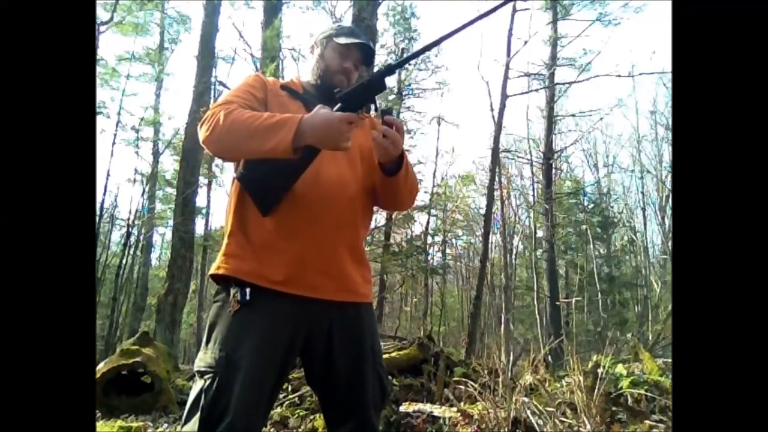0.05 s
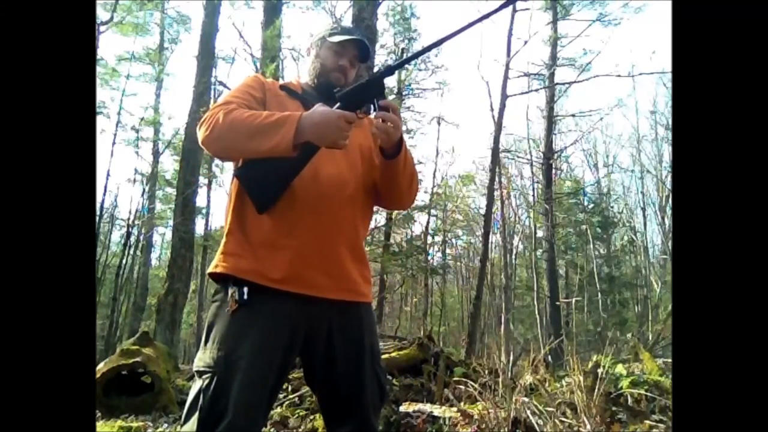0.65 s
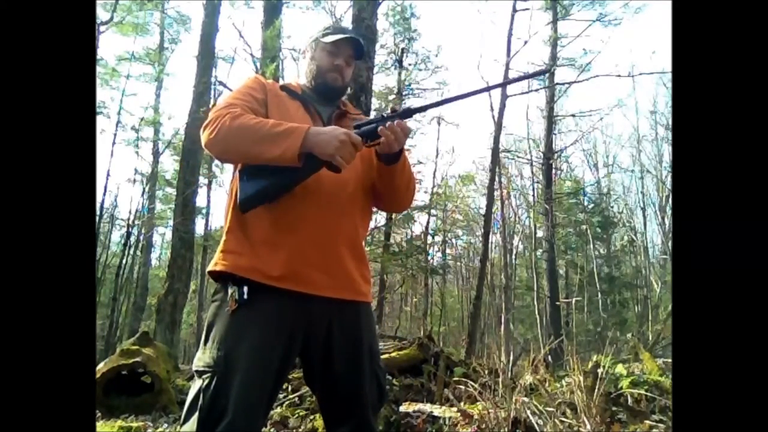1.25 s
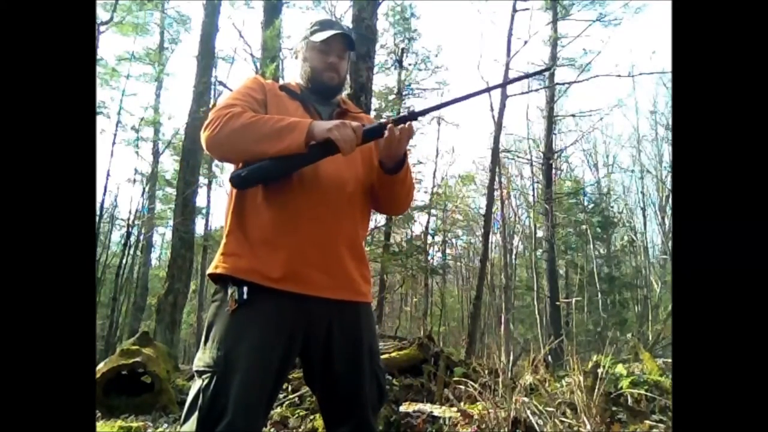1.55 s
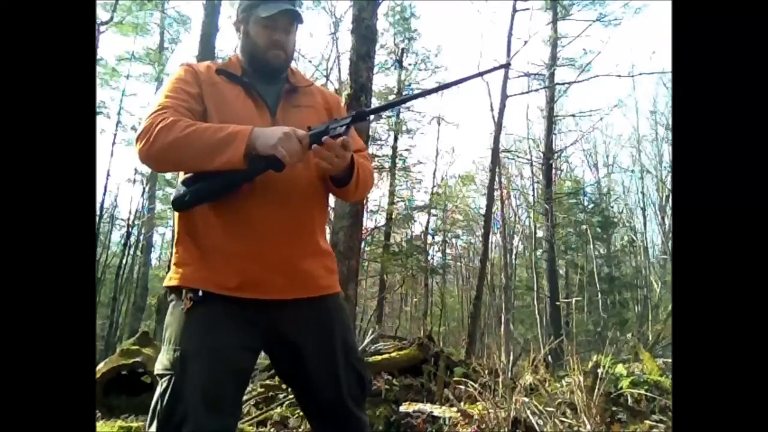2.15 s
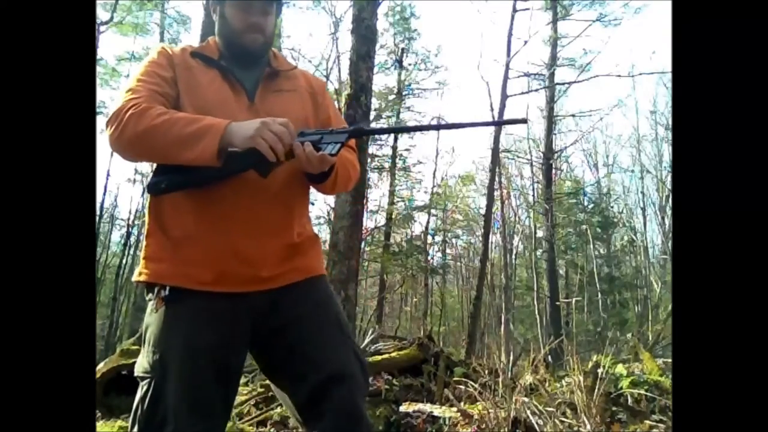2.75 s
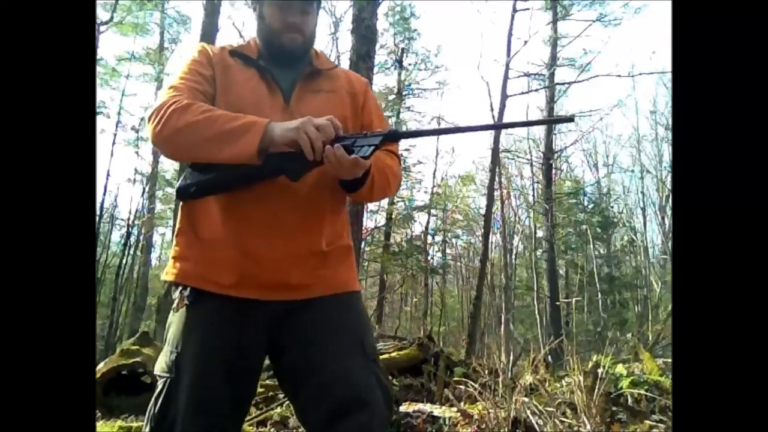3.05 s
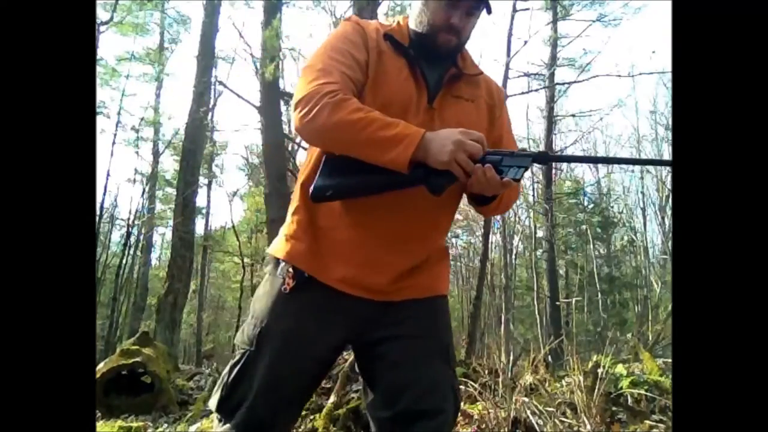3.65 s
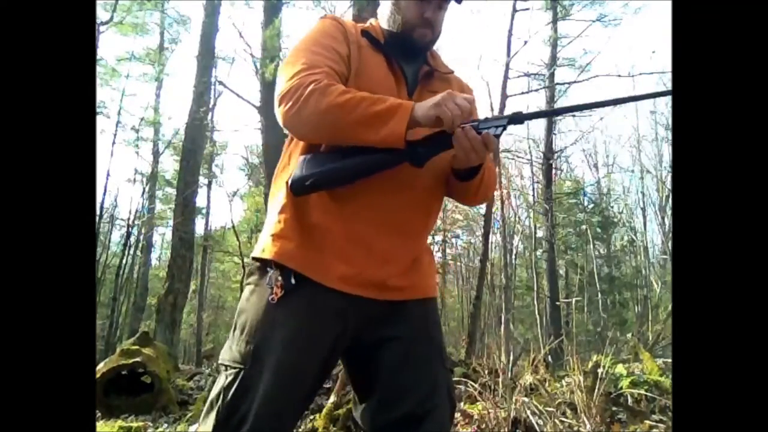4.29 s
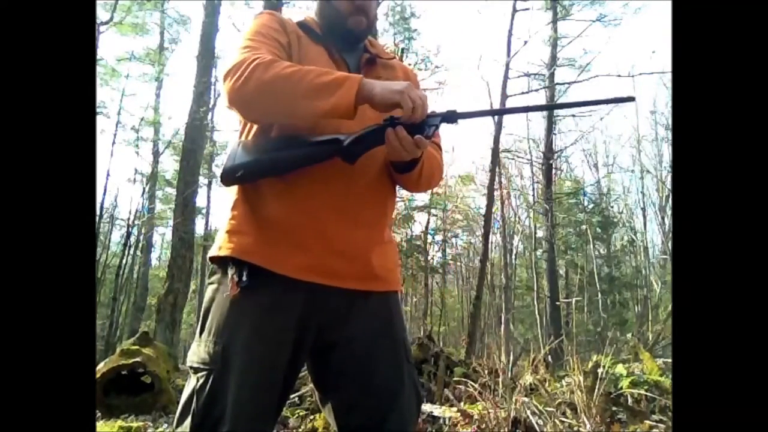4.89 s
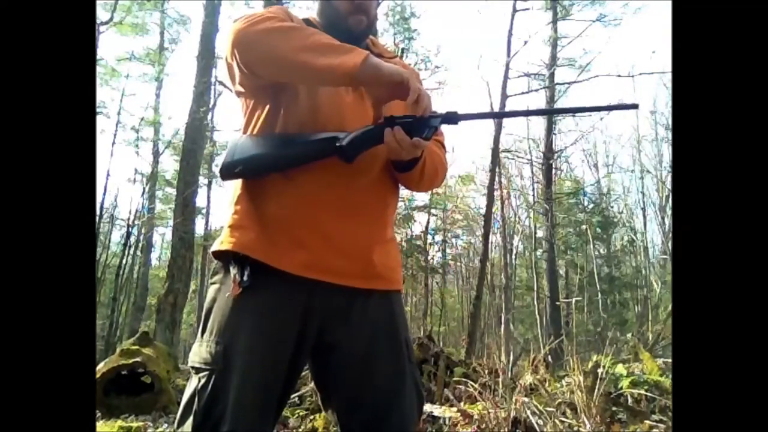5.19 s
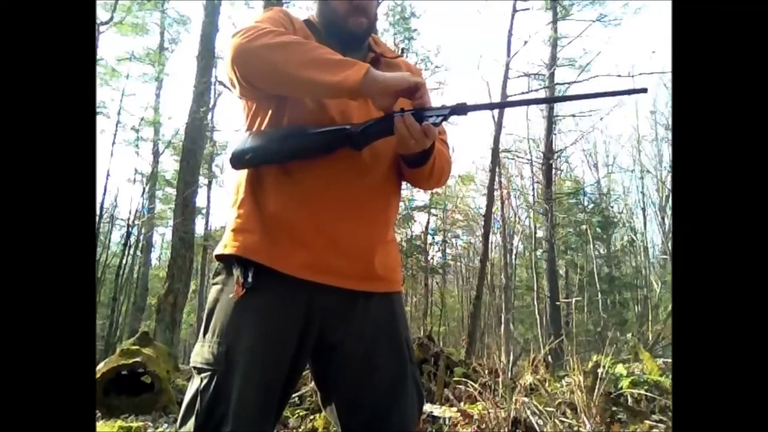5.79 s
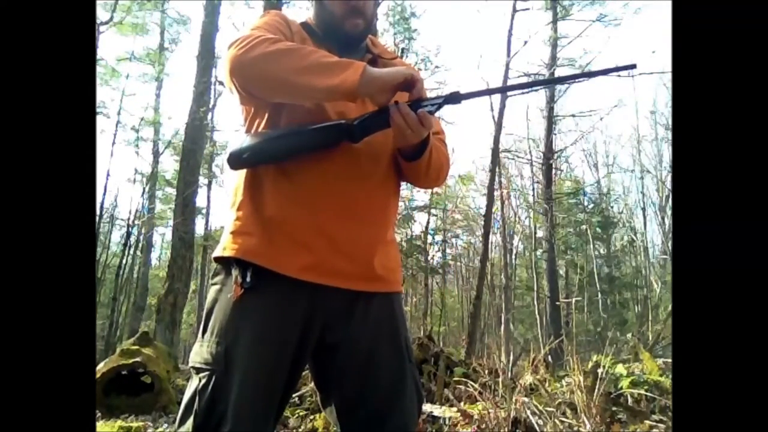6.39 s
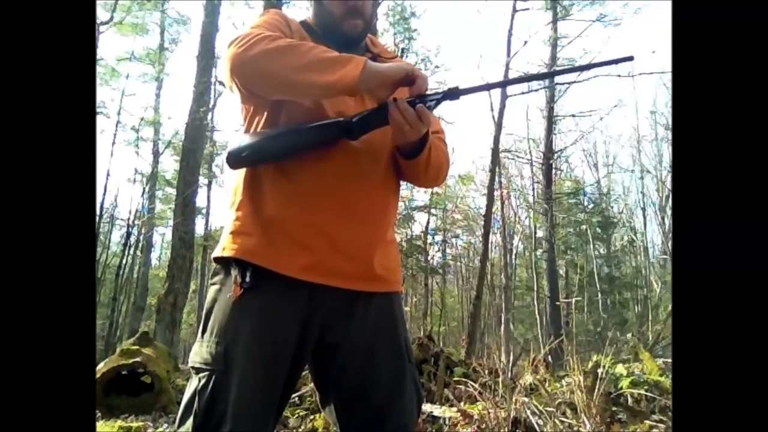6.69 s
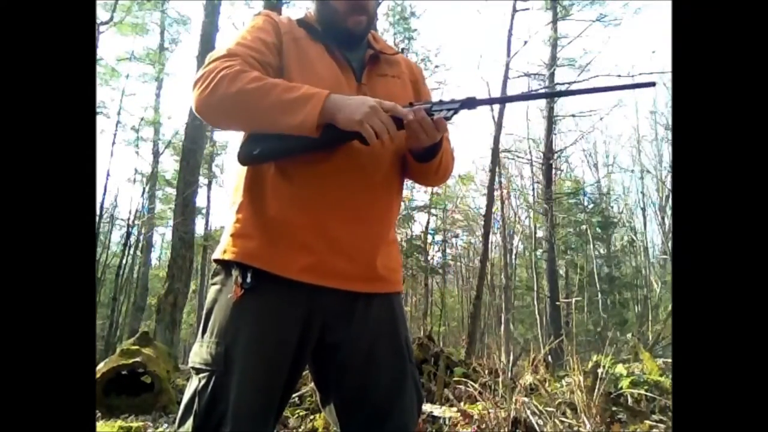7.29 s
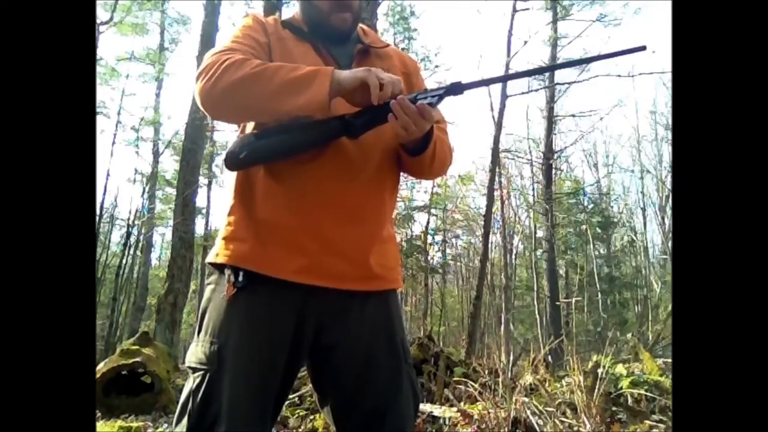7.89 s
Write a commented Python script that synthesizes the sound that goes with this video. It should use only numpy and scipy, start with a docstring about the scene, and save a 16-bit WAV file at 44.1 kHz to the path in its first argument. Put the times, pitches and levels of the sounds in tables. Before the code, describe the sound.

In quiet woods, a rifle magazine clicks into place, feet shift on leaves and twigs, then the bolt slides and snaps shut.

```python
"""In a quiet forest a man loads a small rifle: the magazine scrapes and snaps home, and the bolt is
drawn back and slams shut. Each steel impact radiates a clack and excites the damped modes of the
receiver and the hollow plastic stock. In between, dry leaves and twigs fracture under his feet.
Scattering from the trunks adds a faint tail over distant air and a low drone, and the small port
of the microphone resonates in the treble."""
import sys
import numpy as np
from scipy import signal
from scipy.fft import rfft, irfft, next_fast_len
from scipy.io import wavfile
from scipy.ndimage import map_coordinates

SR = 44100
rng = np.random.default_rng(int(sys.argv[2]) if len(sys.argv) > 2 else 0)


def dump_mix(stems):
    """Bounce the given channels to the path in sys.argv[1] as a 16-bit WAV at rate SR."""
    frames = np.atleast_2d(stems).T  # one column per channel
    limited = np.clip(frames, -1, 1)  # hard clip at full scale
    pcm = np.round(limited * 32767).astype(np.int16)
    wavfile.write(sys.argv[1], SR, pcm)


N = 349922

# Levels are relative within each table.
# spectrum of the forest air: f/Hz, level/dB
AIR_BAND = [(20, -34), (45, -8), (65, -6.5), (110, -3.5), (170, 5.5), (215, 1.5), (290, -3.5), (500, -2.5),
            (1000, -3.5), (1700, -11), (3000, -12.5), (6000, -14.5), (10000, -17), (15500, -20.5)]
# course of a far drone: t/s, f/Hz, level/dB
DRONE_PATH = [(0, 188.7, -73), (2.2, 184.6, -72), (3.2, 161.7, -70), (4.8, 154, -77), (5.5, 155.6, -62.5),
              (6.199, 158, -74.5), (7.95, 159.4, -67.5)]
# reverberation time among the trunks: f/Hz, T60/s
TRUNK_DECAY = [(200, .25), (500, 0.17), (1500, 0.34), (5000, 0.4), (12000, 0.32)]

# stirring of the litter by the feet: t/s, level/dB
TREAD_LEVELS = [(1.85, -70.5), (2.3, -50), (2.52, -49), (2.8, -33), (2.92, -35), (2.97, -40.5),
                (3.1, -42.5), (3.16, -58.5), (3.24, -49), (3.55, -54), (3.74, -49.5), (3.92, -56.5),
                (4.0, -49), (4.1, -51.5), (4.27, -47), (4.52, -52.5), (4.66, -59), (5.3, -69)]
# peaks of the boot scuffs: t/s, level/dB
BOOT_SCUFFS = [(3.05, -39.5), (3.853, -46.5), (4.25, -41)]
# peaks of the sleeve brushing the stock: t/s, level/dB
SLEEVE_BRUSHES = [(7.3, -58.5), (7.45, -53.5), (7.73, -51.5)]
# twigs breaking underfoot: t/s, level/dB, woody body re crack/dB
TWIG_SNAPS = [(2.475, -51.5, 3.5), (2.794, -49, -11), (2.8745, -39, -0.5), (2.889, -38.5, -6),
              (2.922, -42.5, 5), (2.993, -45.5, -3), (3.0201, -42, 3), (3.0562, -46, -11),
              (3.183, -55, 1.5), (3.254, -55, -4), (3.302, -54.5, 3), (3.481, -53.5, -8), (3.834, -48, -17),
              (4.129, -47, -16), (4.193, -50.5, -15), (4.246, -54, 5), (4.688, -48.5, -25)]
# spectra of packed leaves, loose leaves, stalks and soft ground: f/Hz, level/dB
CRUSH_BAND = [(80, -30), (220, 1), (550, 0), (1000, 3.5), (1800, 1), (3200, -6.5), (5000, 4), (9000, -26)]
RUSTLE_BAND = [(1000, -20.5), (2500, -7), (4200, -1.5), (6000, 1.5), (8500, -3), (12500, -1), (15500, -8)]
WOOD_BAND = [(600, -22), (2000, -17), (4000, -7), (6000, -2), (9000, -31)]
THUD_BAND = [(120, -21), (300, -2), (600, 6), (1000, -12), (2000, -38)]

# sliding parts: t/s, duration/s, centre f/Hz, level/dB, treble edge re scrape/dB
SLIDE_STROKES = [(.729, 0.026, 5750, -54, -18), (1.138, .012, 5300, -42, -7),
                 (2.117, 0.026, 5050, -41, -17), (5.031, 0.071, 5230, -55.5, -3),
                 (5.43, .054, 4900, -50.5, -6), (5.608, 0.033, 5900, -58, 1), (5.641, .014, 5740, -44, -5),
                 (6.506, 0.016, 5500, -46, -8), (6.846, .02, 5740, -51.5, 6)]
# steel impacts: t/s, level/dB, weight (stock knock re clack)/dB, treble edge re clack/dB
IMPACTS = [(0.189, -66, 4, 10), (0.3626, -39.5, 2.5, -1), (0.488, -57.5, 3.5, 2), (.776, -59, 10, 5.5),
           (.814, -56, 0, -5), (.96, -60.5, 10, -14), (0.9948, -45, -8.5, -9), (1.005, -40.5, -16, -9),
           (1.015, -43, -5.5, -3), (1.055, -33.5, -18.5, -3.5), (1.149, -27.5, -12, -4),
           (1.167, -34, -5.5, 4.5), (1.181, -29, -19, 3), (1.506, -55, -13, -10), (1.536, -58, -13, -2),
           (1.5689, -27.5, -31, -7), (1.596, -76.5, 23.5, 4), (4.013, -42, -12, -16), (4.456, -44, -11, -4),
           (4.8086, -39.5, -14.5, -9), (5.106, -52, -28, 1), (5.413, -49.5, -14, 11),
           (5.483, -38.5, -7.5, 0.5), (5.598, -56.5, -12, 6), (5.658, -30.5, -21, 0), (5.672, -38.5, 11, 1),
           (5.684, -39.5, -6, 4), (6.173, -64, 9, 3), (6.197, -50, -7.5, 5), (6.495, -57, -3, 0),
           (6.5271, -32.5, -11, 5), (6.533, -31.5, -8, 6.5), (6.646, -63, -27, -6), (6.725, -62, -11, 7.5),
           (6.8643, -21, -2.5, -2), (6.868, -27, -2, 1.5), (6.9687, -27.5, -23.5, -6),
           (6.9886, -41, -16, -9), (7.62, -62.5, -15, -6)]
# modes of the hollow stock, damped by the hands: f/Hz, level/dB, T60/s
STOCK_MODES = [(339, -7, 0.072), (437, -5.5, 0.068), (489, 4.5, 0.049), (550.4, 2.5, 0.069),
               (615, -2.5, 0.056), (818, -8.5, 0.071)]
# modes of barrel and receiver: f/Hz, level/dB, T60/s
STEEL_MODES = [(933, 13, 0.097), (1240, 10.5, 0.13), (1280, -14, 0.045), (1590, -4.5, 0.045),
               (1778, 0, 0.1), (1987, 11, 0.1), (2280, 1.5, .06), (2570, -8, 0.12), (2630, 3.5, 0.032),
               (3030, 0, 0.0577), (3350, 6, 0.07), (3630, -17, 0.03), (3980, -24, 0.042), (4000, 9, 0.1),
               (4600, 4, .05), (4480, 7.5, 0.11), (4830, -3, 0.091)]
# parts that ring on (magazine shell, brass case, stock): t/s, f/Hz, level/dB, T60/s
RINGING_PARTS = [(1.151, 3340, -37, 0.28), (1.182, 440, -42, 0.19), (5.415, 11060, -35, 0.057),
                 (5.485, 3830, -36.5, 0.02), (5.678, 10500, -32, 0.095), (5.675, 783, -40, 0.039),
                 (6.865, 445, -29.5, 0.16), (6.865, 1690, -29, .055), (6.866, 2710, -28, .04)]
# spectra of stock, receiver, clack, treble edge and spring: f/Hz, level/dB
STOCK_BAND = [(100, -48), (240, -24), (340, -9), (510, 9.5), (620, 2.5), (720, -35), (1200, -52.5)]
STEEL_BAND = [(300, -32.5), (850, -1), (1700, 4), (2600, -1.5), (4200, -4.5), (6000, -34), (9000, -42)]
CONTACT_BAND = [(1500, -25), (3200, -4), (4800, 0.5), (5700, 4), (6500, 1.5), (8000, -4.5), (11000, -22),
                (16000, -41.5)]
TREBLE_BAND = [(5000, -41), (8000, -4), (11300, 6), (13000, -1), (15500, -10)]
SPRING_BAND = [(2100, -38), (4700, -18), (6400, 6), (8600, -16), (12000, -43)]

# resonance of the microphone port: f/Hz, bandwidth/Hz, resonant path re direct path/dB
PORT_RESONANCE = [(6075, 616, 11)]


def amp(db):
    """Amplitude ratio of a level in decibels."""
    return 10 ** (np.asarray(db) / 20)


def unit(x):
    """Normalisation to rms 1."""
    return x / np.sqrt(np.mean(x ** 2) + 1e-20)


def unit_energy(x):
    """Normalisation of a transient to the energy of 10 ms at rms 1."""
    return x / np.sqrt(np.sum(x ** 2) / (SR / 100) + 1e-20)


def along(points, hz):
    """Interpolation of (f/Hz, value) points on a logarithmic frequency axis."""
    f, values = np.transpose(points)
    return np.interp(np.log(hz + 1), np.log(f + 1), values)


def wobble(rate):
    """Smooth random modulation with `rate` knots a second."""
    return map_coordinates(rng.standard_normal(int(N * rate / SR) + 4), [np.arange(N) * rate / SR])


def strokes(rows, rise_db_s, fall_db_s):
    """Exponential growth and decay about each (t/s, level/dB) peak."""
    t = np.arange(N) / SR
    return sum(amp(db - np.maximum(rise_db_s * (s - t), fall_db_s * (t - s))) for s, db in rows)


def filtered(x, response):
    """Linear filtering: the spectrum is multiplied by a frequency response."""
    size = next_fast_len(len(x) + 4096)
    return irfft(rfft(x, size) * response(np.fft.rfftfreq(size, 1 / SR)), size)[:len(x)]


def coloured(x, band):
    """Spectral shaping by a band, at rms 1."""
    return unit(filtered(x, lambda hz: amp(along(band, hz))))


def add(track, s, sound):
    """Superposition of a sound on the track at time s."""
    part = track[round(s * SR):][:len(sound)]
    part += sound[:len(part)]


def crackle(band, rate, spread_db, clump_db, bed_db):
    """Shot noise: tiny fractures or slips of uneven size swell in clumps over rubbing noise."""
    sizes = amp(spread_db * np.minimum(rng.exponential(size=N), 4.5))
    signs = np.sign(rng.standard_normal(N))
    grains = unit(sizes * signs * (rng.random(N) < rate / SR))
    clumps = amp(clump_db * wobble(120))
    rubbing = amp(bed_db) * rng.standard_normal(N)
    return coloured((grains + rubbing) * clumps, band)


def burst(t, band, length, attack=0.00015, snap_db=-40, tail_db=-20, tail_t60=0.18,
          tilt_db=0, uneven_db=4):
    """Modal overlap: dense modes merge into noise, with a snap, chatter during contact and a tail."""
    hz = np.fft.rfftfreq(len(t), 1 / SR)
    group_hz = np.arange(1, 60) * 280
    # each point of contact favours its own groups of modes
    group_db = tilt_db * np.log2(group_hz / group_hz[0]) + uneven_db * rng.standard_normal(len(group_hz))
    colour = amp(along(band, hz) + np.interp(hz, group_hz, group_db))
    noise = irfft(rfft(rng.standard_normal(len(t))) * colour, len(t))
    snap = amp(snap_db) * np.exp(-t / 0.00074)
    chatter = np.exp(-(t / length) ** 3)
    tail = amp(tail_db - 60 * t / tail_t60)
    return unit_energy(noise * (snap + chatter + tail) * (1 - np.exp(-t / attack)))


def ring(t, modes, attack):
    """Free vibration: damped modes, excited at new strengths and phases by each blow."""
    hz, db, t60 = np.transpose(modes)[:, :, None]
    level = db + 2 * rng.standard_normal(hz.shape)
    phase = rng.uniform(0, 2 * np.pi, hz.shape)
    partials = amp(level - 60 * t / t60) * np.sin(2 * np.pi * hz * t + phase)
    return unit_energy(partials.sum(0) * (1 - np.exp(-t / attack)))


def forest():
    """Ambient noise: broadband air in the trees and a faint, wavering narrowband drone."""
    air = amp(-60.5 + 0.44 * wobble(2.3)) * coloured(rng.standard_normal(N), AIR_BAND)
    s, hz, db = np.transpose(DRONE_PATH)
    t = np.arange(N) / SR
    phase = 2 * np.pi * np.cumsum(np.interp(t, s, hz)) / SR
    drone = unit(wobble(12) * np.sin(phase) + wobble(9) * np.cos(phase))
    return air + amp(np.interp(t, s, db)) * drone


def trunk_echoes(x, build_s=0.0074):
    """Scattering: the trunks return a diffuse tail in which each frequency decays at its own rate."""
    hz, t, noise = signal.stft(rng.standard_normal(SR), SR, nperseg=256)
    envelope = amp(-60 * t / along(TRUNK_DECAY, hz)[:, None]) * (1 - np.exp(-t / build_s))
    tail = signal.istft(noise * envelope, SR, nperseg=256)[1]
    return signal.fftconvolve(x, tail / np.linalg.norm(tail))[:N]


def leaves(settle_s=0.18):
    """Brittle fracture: loose leaves rustle at once; the packed ones lag as the weight settles."""
    s, db = np.transpose(TREAD_LEVELS)
    tread_db = np.interp(np.arange(N) / SR, s, db, left=-120, right=-120)
    stir = np.hypot(amp(tread_db - 2.5), strokes(BOOT_SCUFFS, rise_db_s=370, fall_db_s=480))
    pole = np.exp(-1 / (settle_s * SR))
    load = (stir + signal.lfilter([1 - pole], [1, -pole], stir)) / 2
    crush = load * crackle(CRUSH_BAND, rate=2000, spread_db=4, clump_db=1.5, bed_db=-1)
    rustle = stir * crackle(RUSTLE_BAND, rate=1700, spread_db=2.3, clump_db=2, bed_db=-2.5)
    # single leaves crack no louder under a hard tread, so they stand out in the lulls
    capped_stir = np.minimum(stir, amp(-53))
    singles = capped_stir * crackle(RUSTLE_BAND, rate=130, spread_db=3.6, clump_db=2, bed_db=-40)
    return amp(-8) * crush + amp(1.3) * rustle + amp(-2.5) * singles


def sleeve():
    """Friction noise: cloth brushes the stock."""
    friction = crackle(RUSTLE_BAND, rate=3400, spread_db=4, clump_db=1.5, bed_db=1)
    return amp(-9) * strokes(SLEEVE_BRUSHES, rise_db_s=110, fall_db_s=160) * friction


def footfall(s=2.735, db=-44):
    """Soft impact: the long contact of boot and ground gives a dull thud."""
    out, t = np.zeros(N), np.arange(SR // 10) / SR
    add(out, s, amp(db) * burst(t, THUD_BAND, length=0.035, attack=0.0026))
    return out


def twigs():
    """Sudden release of strain: dry stalks break with short, unpitched cracks."""
    out, t = np.zeros(N), np.arange(SR // 20) / SR
    for s, db, body_db in TWIG_SNAPS:
        body = amp(body_db + 2) * burst(t, WOOD_BAND, length=0.0068, snap_db=5)
        crack = amp(0.9) * burst(t, CONTACT_BAND, length=0.0037, snap_db=11)
        edge = amp(-3.5) * burst(t, TREBLE_BAND, length=0.01, snap_db=7)
        add(out, s, amp(db) * (body + crack + edge))
    return out


def slides(swell_db=1.5):
    """Stick-slip friction: tiny slips excite magazine, spring and bolt as they move in their guides."""
    out = np.zeros(N)
    slips = crackle([(1000, 0), (16000, 0)], rate=2000, spread_db=3, clump_db=1.5, bed_db=-6)
    edge = crackle(TREBLE_BAND, rate=2800, spread_db=2.5, clump_db=1, bed_db=-11)
    for s, duration, hz, db, edge_db in SLIDE_STROKES:
        start, n = round(s * SR), round(duration * SR)
        span = slice(start, start + n)
        envelope = amp(db + swell_db * np.linspace(-0.5, 0.5, n)) * signal.windows.tukey(n, 0.2)
        resonance = [(hz / 2, -38), (hz / 1.42, -14), (hz, 0), (hz * 1.4, -14), (hz * 1.9, -35)]
        scrape = coloured(slips[span], resonance) + amp(edge_db) * unit(edge[span])
        add(out, s, envelope * scrape)
    return out


def spring(s=1.576, db=-45):
    """Free decay: the spring's close modes shiver in one bright band after the catch snaps."""
    out, t = np.zeros(N), np.arange(SR // 3) / SR
    add(out, s, amp(db) * burst(t, SPRING_BAND, length=0.005, tail_db=0, tail_t60=0.39, uneven_db=2))
    return out


def stock_knock(t, contact_s, cutoff_hz=340):
    """Radiation from a small body: the hollow stock knocks with a slow onset and little bass."""
    modes = amp(1) * ring(t, STOCK_MODES, attack=0.0059)
    noise = amp(-3) * burst(t, STOCK_BAND, 1.36 * contact_s, attack=0.0038, uneven_db=3)
    highpass = signal.butter(3, cutoff_hz, 'high', fs=SR, output='sos')
    return signal.sosfilt(highpass, modes + noise)


def receiver_ring(t, contact_s, weight_db):
    """Selective excitation: light parts that hardly shake the stock favour the higher steel modes."""
    tilt_db = np.clip(0.44 * (-weight_db - 8.5), 0, 6)  # per octave
    lowest_hz = STEEL_MODES[0][0]
    tilted = [(hz, db + tilt_db * np.log2(hz / lowest_hz), t60) for hz, db, t60 in STEEL_MODES]
    modes = amp(-5.5) * ring(t, tilted, attack=0.00055)
    return modes + burst(t, STEEL_BAND, 1.23 * contact_s, attack=0.00028, snap_db=-3.5,
                         tail_db=-5, tail_t60=0.11, tilt_db=tilt_db + 1.5)


def rifle():
    """Impact excitation: steel strikes steel, clacks, and sets receiver, stock and thin parts ringing."""
    out, t = np.zeros(N), np.arange(SR // 6) / SR
    for s, db, weight_db, edge_db in IMPACTS:
        # weight lengthens the contact; a firm blow, above -35 dB, shortens it
        doublings = (weight_db + 2.5) / 52 - max(db + 35, 0) / 110
        contact_s = 0.0098 * 2 ** doublings
        knock = amp(weight_db) * stock_knock(t, contact_s)
        # the receiver lies between contact and stock, so it takes a share of the weight
        steel = amp(0.48 * weight_db - 1.3) * receiver_ring(t, contact_s, weight_db)
        clack = burst(t, CONTACT_BAND, 1.48 * contact_s, snap_db=6.5,
                      tail_db=-6.5, tail_t60=0.086, uneven_db=0.5)
        edge = burst(t, TREBLE_BAND, 1.46 * contact_s, snap_db=-1, tail_db=-7, tail_t60=0.11, uneven_db=3)
        add(out, s, amp(db) * (knock + steel + amp(1.5) * clack + amp(edge_db - 1.5) * edge))
    for s, hz, db, t60 in RINGING_PARTS:
        # a thin shell splits its mode into a close, beating cluster
        cluster = [(hz * (1 + 0.013 * k), -k, t60) for k in range(5)]
        add(out, s, amp(db) * ring(t, cluster, attack=0.0005))
    return out


def scene():
    """Superposition of the direct sound of rifle and man, its echoes and the ambient noise."""
    direct = rifle() + spring() + slides() + twigs() + leaves() + sleeve() + footfall()
    return (direct + amp(-24) * trunk_echoes(direct) + forest())[None]


def record(dry, low_hz=61, top_hz=15600):
    """Resonance and saturation: the microphone's port rings, peaks round off and the band is limited."""
    def port(f):
        return 1 + sum(amp(db) * 1j * f * width / (hz ** 2 - f ** 2 + 1j * f * width)
                       for hz, width, db in PORT_RESONANCE)

    def passband(f):
        return (1j * f / (low_hz + 1j * f)) ** 2 / np.sqrt(1 + (f / top_hz) ** 200)

    pressure = filtered(dry[0], port)
    saturated = pressure / (1 + np.abs(pressure) ** 6) ** (1 / 6)
    return filtered(saturated, passband)[None]


dry = scene()
out = record(dry)
dump_mix(out)
```